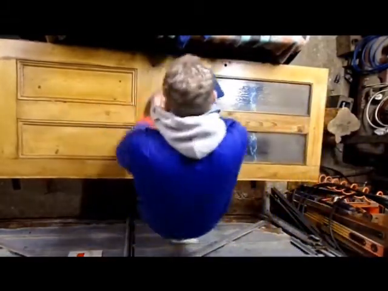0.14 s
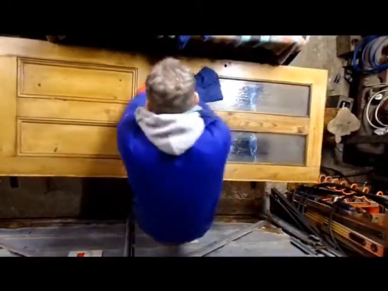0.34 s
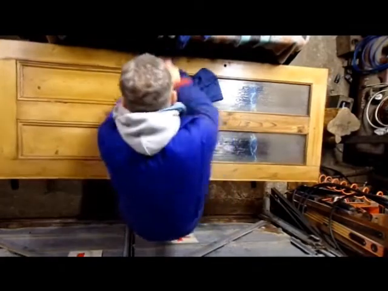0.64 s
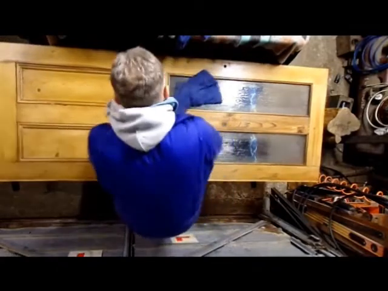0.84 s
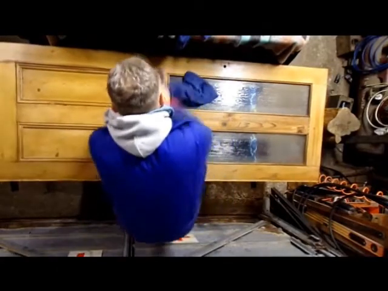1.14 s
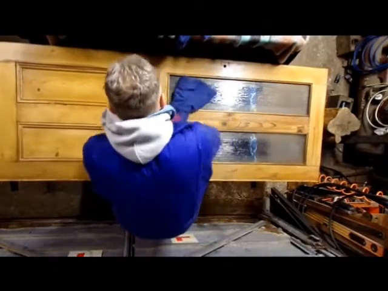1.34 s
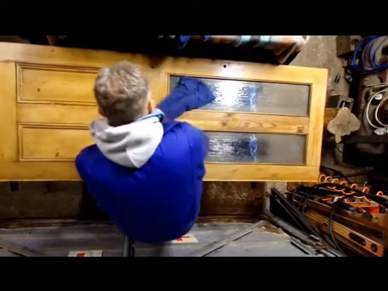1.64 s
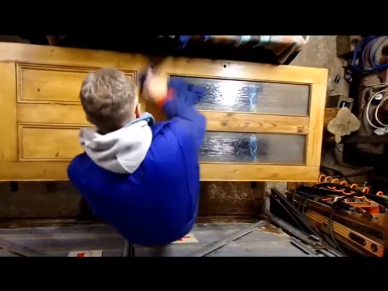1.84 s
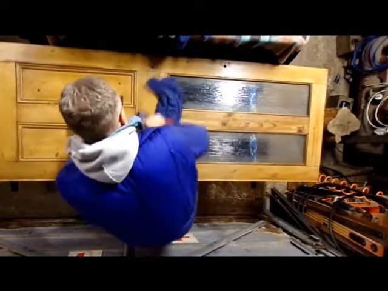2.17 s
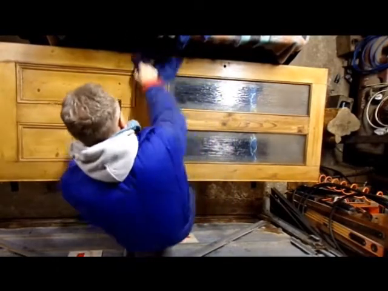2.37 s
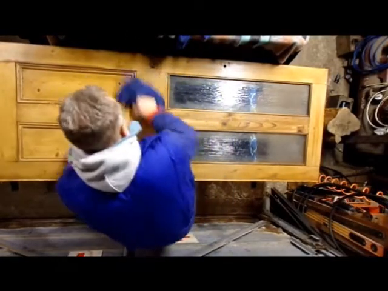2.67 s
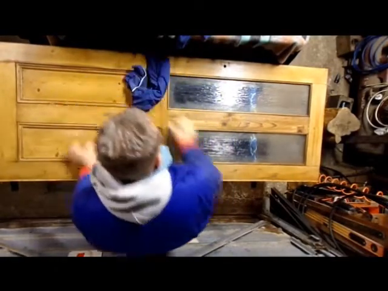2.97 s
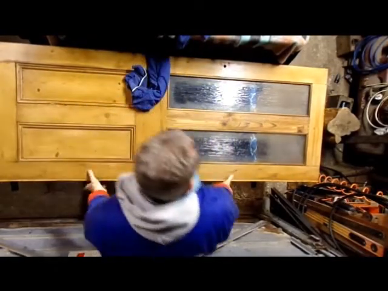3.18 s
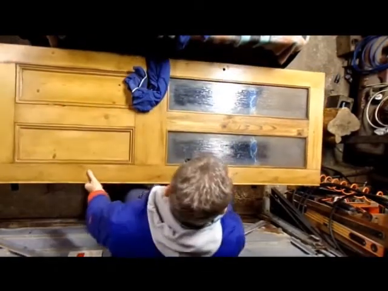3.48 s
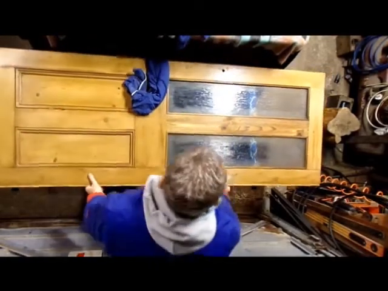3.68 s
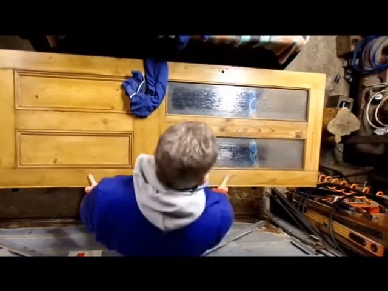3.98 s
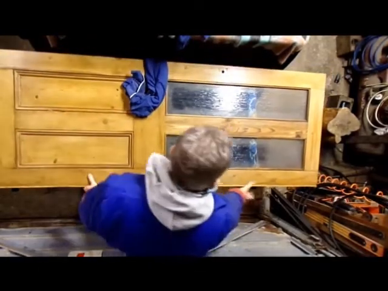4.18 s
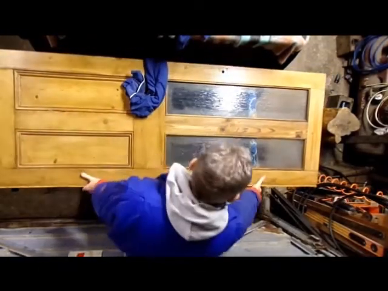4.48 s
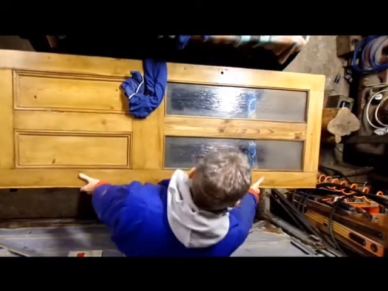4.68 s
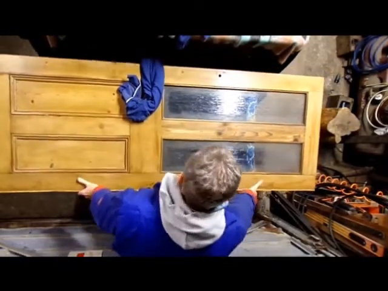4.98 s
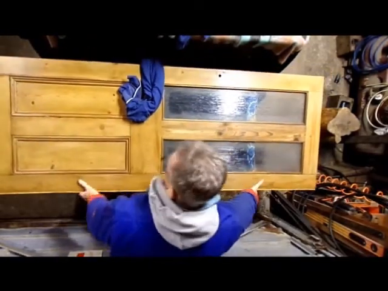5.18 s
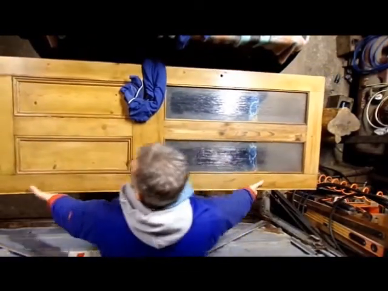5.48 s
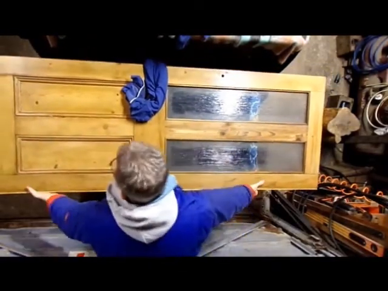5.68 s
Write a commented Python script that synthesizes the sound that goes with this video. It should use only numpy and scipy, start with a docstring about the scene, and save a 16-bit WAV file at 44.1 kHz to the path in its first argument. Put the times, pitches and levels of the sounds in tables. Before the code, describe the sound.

Uneven cloth strokes on varnished wood, close and mono in a small workshop. Deep hollow thuds and sharp knocks dominate early, each rebounding quickly as the door rocks and its glass panes buzz. The middle is sparse: soft rubbing, brief high squeaks, light swishes. Later, hands shift the door with a few duller knocks, faint loose-metal chatter and a last soft bump. Quiet hiss lies underneath.

```python
"""In a small workshop a glazed wooden door lies flat and is wiped with a cloth in uneven strokes.
Hands shift it: knocks and decaying modes boom, shaped noise thuds in the wood and rattles the panes.
Coloured grainy noise makes drone, scrape, swish and clicks; gliding tones squeak, loose metal tinkles.
A room tail surrounds the brighter sounds; a mono microphone notches the band and clips high peaks."""
import sys
import numpy as np
from scipy import signal
from scipy.fft import rfft, irfft, next_fast_len
from scipy.io import wavfile
from scipy.ndimage import map_coordinates

SR = 44100
rng = np.random.default_rng(int(sys.argv[2]) if len(sys.argv) > 2 else 0)


def to_wav(s):
    """Save 16-bit WAV."""
    ch = np.atleast_2d(s).T  # columns
    pcm = np.round(np.clip(ch, -1, 1) * 32767)  # PCM
    wavfile.write(sys.argv[1], SR, pcm.astype(np.int16))


N = 256662
TIME = np.arange(N) / SR

# door on its supports: t/s, level/dB, knock f/Hz; rel. to level: wood/dB, rattle/dB, first rebound/dB;
# rocking t60/s
DOOR_BUMPS = [(.016, -25.5, 98, -7.5, -20, -15, 0.3), (0.052, -25, 99, -8.5, -22, -15, 0.23),
              (0.258, -42.5, 147, -2.5, -23, 1.5, .8), (.433, -11, 320, -5, -12, -8.5, 0.6),
              (0.527, -27.5, 100, -4, -17, -14, 0.35), (.57, -28.5, 282, -2, -22, -3, 0.36),
              (0.813, -14, 176, -3, -9.5, -5, 0.44), (.915, -23, 92.5, -9.5, -23, -13.5, 0.66),
              (1.114, -29, 294, -0.5, -19.5, -5.5, 0.35), (1.168, -32.5, 91, -28, -17.5, -18, 0.79),
              (1.368, -35, 183, -7, -17, -8, 0.32), (1.4, -34.5, 108, -20, -37.5, -19.5, 0.27),
              (2.357, -47, 95, -9, -15, -10, 0.27), (2.471, -42.5, 89.5, -6.5, -3, -12, 0.27),
              (2.845, -36, 280, -6, -6, -6.5, 0.31), (3.275, -40.5, 123, -18, -40, -17, .3),
              (3.445, -40, 92, -7, -13, -7, 0.23), (3.556, -41.5, 169, -22, -17, -6.5, .3),
              (3.787, -27.5, 142, -29.5, -18, -24.5, 0.33), (3.801, -24, 314, -5, -13.5, -17, 0.54),
              (3.839, -32.5, 93.7, -21, -30, -23, 0.52), (4.555, -44, 277, -15, -13, -13.5, .4),
              (4.62, -34.5, 121, -5.5, -20.5, -16, 0.61), (4.88, -26, 274, -4, -19, -20, .2),
              (4.888, -22, 200, -7, -11, -9.5, 0.36), (5.751, -36, 180, -10, -18, -7, .5)]


def amp(db):
    """Decibels to gain."""
    return 10 ** (np.asarray(db) / 20)


def unit(x):
    """Scale to rms 1."""
    return x / np.sqrt(np.mean(x ** 2) + 1e-20)


def along(points, hz):
    """(f/Hz, value) points interpolated on a log frequency axis."""
    f, v = np.transpose(points)
    return np.interp(np.log(hz + 1), np.log(f + 1), v)


def filtered(x, response):
    """x times a response of frequency."""
    m = next_fast_len(len(x) + 8192)  # padding keeps the end from wrapping round
    return irfft(rfft(x, m) * response(np.fft.rfftfreq(m, 1 / SR)), m)[:len(x)]


def wobble(rate_hz, size):
    """A smooth random curve, rate_hz knots a second."""
    knots = rng.standard_normal(int(size * rate_hz / SR) + 4)
    return map_coordinates(knots, [np.arange(size) * rate_hz / SR])


def friction(spectrum, size, grain_db, tilt_db=0):
    """Tiny slips of uneven strength, coloured by a spectrum and a tilt per octave; rms 1."""
    slips = rng.standard_normal(size) * amp(grain_db * wobble(300, size))

    def colour(hz):
        octaves = np.log2(np.maximum(hz, 700) / 3000)
        return amp(along(spectrum, hz) + tilt_db * octaves)

    return unit(filtered(slips, colour))


def add(track, s, sound):
    """Mix a sound into the track at s seconds."""
    start = min(max(round(s * SR), 0), N)
    track[start:start + len(sound)] += sound[:N - start]


def strike(t, rise_s, t60_s):
    """An envelope that builds up and dies away."""
    return (1 - np.exp(-t / rise_s)) * amp(-60 * t / t60_s)


def in_room(x, wet_db):
    """The sound plus a diffuse workshop tail whose noise decays at a rate set by frequency."""
    # workshop decay: f/Hz, t60/s
    room_decay = [(60, 0.35), (200, 0.18), (1000, 0.15), (3000, 0.17), (8000, 0.23), (15000, 0.04)]
    hz, t, z = signal.stft(rng.standard_normal(SR // 2), SR, nperseg=256)
    decay = amp(-60 * t / along(room_decay, hz)[:, None])
    tail = signal.istft(z * decay, SR, nperseg=256)[1]
    tail = np.pad(tail / np.linalg.norm(tail), (SR // 150, 0))  # delayed by 1/150 s
    return x + amp(wet_db) * signal.fftconvolve(x, tail)[:len(x)]


def floor_noise():
    """Still room and microphone hiss: steady shaped noise."""
    # floor colour: f/Hz, relative level/dB
    floor_colour = [(25, -2), (90, 7.5), (300, 8), (1000, 4), (3000, -2.5), (7000, -15), (10500, -21.5),
                    (13000, -10), (15500, -9.5)]
    noise = rng.standard_normal(N)
    return amp(-74) * unit(filtered(noise, lambda hz: amp(along(floor_colour, hz))))


def tinkles():
    """A small loose piece of metal chatters: random phase jitters a few high modes."""
    # tinkles: t/s, level/dB
    metal_hits = [(3.813, -58), (4.676, -64), (4.704, -55.5), (4.93, -57.5)]
    # metal modes: f/Hz, relative level/dB, t60/s
    metal_modes = [(3870, 2, 0.1), (6760, -6.5, 0.14), (8870, -5, 0.1)]
    out, t = np.zeros(N), np.arange(SR // 3) / SR
    for s, db in metal_hits:
        for hz, mode_db, t60_s in metal_modes:
            chatter_rad = 1.83 * wobble(435, len(t))
            tone = np.sin(2 * np.pi * hz * t + chatter_rad)
            add(out, s, amp(db + mode_db) * strike(t, 0.0026, t60_s) * tone)
    return out


def squeaks():
    """Hands catch on the varnish; stick and slip lock briefly into a gritty, gliding pitch."""
    # catches: t/s, length/s, first f/Hz, last f/Hz, level/dB, roughness as a share of the pitch
    catches = [(1.428, 0.24, 291.7, 294, -58.5, .013), (1.55, 0.095, 550, 629, -62.5, 0.13),
               (2.057, .05, 2276, 2290, -55.5, 0.053), (2.225, 0.015, 3460, 3390, -54, 0.032),
               (2.233, 0.038, 2017, 1980, -47.5, .07), (3.547, 0.022, 1364, 1400, -61, 0.093),
               (5.165, .022, 3900, 3920, -56, .05), (5.671, 0.046, 2494, 2470, -60.5, .16)]
    out, t = np.zeros(N), np.arange(SR // 2) / SR
    for s, length_s, first_hz, last_hz, db, rough in catches:
        u = np.minimum(t / length_s, 1)
        glide_hz = first_hz + (last_hz - first_hz) * u
        hz = glide_hz * (1 + rough * wobble(1173, len(t)))
        stutter_db = min(100 * rough, 7)  # rougher slips also stutter in level
        breaks = unit(amp(stutter_db * wobble(first_hz / 8, len(t))))
        grip = amp(db) * breaks * np.abs(np.sin(np.pi * u)) ** .5
        add(out, s, grip * np.sin(2 * np.pi * np.cumsum(hz) / SR))
    return out


def clicks():
    """Hard edges meet in a brief, bright crack of noise."""
    # crack colour: f/Hz, relative level/dB
    crack_colour = [(400, -34.5), (1500, 1.5), (4000, 5), (7000, -1.5), (10000, -7.5), (15000, -3.5)]
    # edge contacts: t/s, level/dB, t60/s
    edge_contacts = [(.429, -39, 0.066), (0.433, -36.5, 0.013), (0.813, -42, 0.011), (2.231, -66, 0.015),
                     (3.327, -45, 0.005), (3.602, -60, 0.015), (3.803, -50, 0.021), (4.889, -48.5, 0.064),
                     (5.17, -63, 0.014)]
    out, t = np.zeros(N), np.arange(SR // 8) / SR
    for s, db, t60_s in edge_contacts:
        crack = friction(crack_colour, len(t), grain_db=2)
        add(out, s, amp(db) * crack * strike(t, 0.00044, t60_s))
    return out


def flicks():
    """Quick cloth and sleeve strokes: friction noise swells, then fades as the hand slows."""
    # flicks: t/s, relative level/dB, rise/s, fall t60/s, brightness/dB per octave
    quick_strokes = [(0.166, -41, .017, 0.11, 1), (.181, -36, 0.032, 0.094, 0.5),
                     (.418, -32, 0.031, 0.059, -11.5), (0.699, -56.5, 0.015, 0.1, -4),
                     (.783, -36.5, .032, 0.08, -10), (1.117, -56, 0.036, 0.17, 6),
                     (1.859, -54.5, 0.03, .1, -.5), (2.07, -57, 0.0086, .1, 1),
                     (2.231, -52.5, 0.0044, 0.16, -1.5), (2.311, -51, 0.019, 0.24, -2.5),
                     (2.476, -63, 0.015, 0.063, -5), (2.744, -46.5, 0.0046, 0.45, -5.5),
                     (2.86, -50, 0.052, 0.15, 2.5), (3.235, -61.5, .01, 0.24, 2),
                     (3.326, -44, 0.0047, 0.17, 0.5), (3.395, -51, 0.012, 0.1, -8.5),
                     (3.598, -50, 0.0037, 0.17, 1), (5.169, -56.5, 0.0062, 0.11, -3.5),
                     (5.657, -61, 0.0063, 0.18, 0)]
    # swish colour: f/Hz, relative level/dB
    swish_colour = [(410, -10.5), (750, -12.5), (1100, -13), (1450, -5.5), (2100, 0), (3000, -1),
                    (5300, -9.5), (9300, -20), (11700, -36.5), (15500, -32)]
    out, t = np.zeros(N), np.arange(SR // 2) / SR
    for s, db, rise_s, t60_s, bright_db in quick_strokes:
        swell = np.sqrt(np.minimum(t / rise_s, 1))
        fade = amp(-60 * np.maximum(t - rise_s, 0) / t60_s)
        swish = friction(swish_colour, len(t), grain_db=-1.0, tilt_db=bright_db)
        add(out, s, amp(db - 1.5) * swell * fade * swish)
    return out


def stroke(middle_s, length_s):
    """The hand leans in and lets go; length_s spans the -10 dB points."""
    sharpness = 1.2
    return amp(-20 * np.abs(2 * (TIME - middle_s) / length_s) ** sharpness / 2)


def rubbing():
    """Cloth drags over the grain; leaf drones, panels scrape, fibres hiss: (drone, rustle)."""
    # cloth and sleeve hiss before pressure flutter: t/s, level/dB
    light_hiss = [(0, -77), (.16, -57.5), (.29, -62), (.36, -60), (.74, -61), (1.25, -65), (1.75, -69),
                  (2.0, -62.5), (2.2, -66), (2.42, -58), (2.68, -63.5), (2.96, -56.5), (3.1, -76.5),
                  (3.3, -64.5), (4.1, -74), (4.55, -77), (4.72, -64), (5.1, -72), (5.42, -65), (5.82, -74)]
    # firm strokes before pressure flutter: middle t/s, length/s, drone level/dB, scrape level/dB
    firm_strokes = [(.01, 0.066, -29.5, -41.5), (0.273, 0.095, -46.5, -55.5), (1.58, 0.072, -68.5, -69),
                    (1.898, 0.037, -69, -60), (1.988, 0.082, -55.5, -70), (2.19, 0.054, -60.5, -86),
                    (2.36, 0.097, -59, -60), (2.474, 0.17, -56, -65), (2.77, 0.14, -76, -56),
                    (2.888, 0.23, -59, -56.5), (3.29, 0.069, -50, -78), (3.36, 0.087, -58, -55),
                    (3.48, .12, -50.5, -67), (3.586, 0.18, -61, -71.5), (3.98, 0.073, -54.5, -78),
                    (4.442, 0.16, -64.5, -79), (4.595, 0.059, -60, -75), (4.704, .17, -45, -58.5),
                    (5.428, 0.72, -66, -77.5), (5.804, 0.13, -50, -54.5)]
    # leaf, panel and fibre colours: f/Hz, relative level/dB
    drone_colour = [(30, -29.5), (60, -33.5), (85, 4), (110, -1), (170, -4.5), (230, -7.5), (290, -5.5),
                    (420, -18.5), (700, -64.5)]
    scrape_colour = [(250, -9.5), (450, -1.5), (600, 5.5), (700, -4.5), (800, 2.5), (1100, -13), (1500, -7),
                     (2500, -43.5)]
    cloth_colour = [(590, -45), (1000, -7.5), (1200, -11.5), (1710, -4.5), (2530, -2), (3650, -8),
                    (4010, -5.5), (4440, -11.5), (6260, -16.5), (7970, -22.5), (8940, -19), (11600, -38),
                    (15500, -25)]
    light_drone_db, light_scrape_db = -4.5, -7.5  # relative to the light hiss
    stroke_hiss_db = -9  # relative to the stroke's scrape
    shudder_db, shudder_scrape_db = -19, -18  # relative to the bump, to the shudder
    shudder_rise_s, shudder_t60_ratio = .02, 1.21  # ratio to the rocking t60

    hiss_power = amp(np.interp(TIME, *np.transpose(light_hiss))) ** 2
    drone_power = hiss_power * amp(light_drone_db) ** 2
    scrape_power = hiss_power * amp(light_scrape_db) ** 2
    for middle_s, length_s, drone_db, scrape_db in firm_strokes:
        lean = stroke(middle_s, length_s)
        drone_power += (amp(drone_db) * lean) ** 2
        scrape_power += (amp(scrape_db) * lean) ** 2
        hiss_power += (amp(scrape_db + stroke_hiss_db) * lean) ** 2

    t = np.arange(SR) / SR
    for s, db, *_, rocking_t60_s in DOOR_BUMPS:  # a bumped leaf also rubs on its supports
        shudder = amp(db + shudder_db) * strike(t, shudder_rise_s, shudder_t60_ratio * rocking_t60_s)
        add(drone_power, s, shudder ** 2)
        add(scrape_power, s, (amp(shudder_scrape_db) * shudder) ** 2)

    pressure = amp(1.8 * wobble(24.29, N))
    drone = np.sqrt(drone_power) * friction(drone_colour, N, grain_db=4)
    scrape = np.sqrt(scrape_power) * friction(scrape_colour, N, grain_db=1.0)
    hiss = np.sqrt(hiss_power) * friction(cloth_colour, N, grain_db=2)
    return pressure * drone, pressure * (scrape + hiss)


def contacts(count=6):
    """Bumps and rebounds as the door rocks to rest: (t/s, dB, knock f/Hz, wood/dB, rattle/dB)."""
    gap_s, gap_ratio, gap_scatter = .027, 0.94, .08  # ratio: each nominal gap over the last
    rebound_hz, scatter_octaves = 146, 0.14
    rebound_wood_db, rebound_rattle_db = -5, -0.5  # added to the bump's wood and rattle
    rows, k = [], np.arange(count)
    for s, db, knock_hz, wood_db, rattle_db, rebound_db, rocking_t60_s in DOOR_BUMPS:
        late, sharp = rng.standard_normal((2, count))
        times = s + np.cumsum(gap_s * gap_ratio ** k * (1 + gap_scatter * late))
        levels = db + rebound_db - 60 * (times - times[0]) / rocking_t60_s
        pitches = rebound_hz * 2 ** (scatter_octaves * sharp)
        rows.append((s, db, knock_hz, wood_db, rattle_db))
        for rebound in zip(times, levels, pitches):
            rows.append((*rebound, wood_db + rebound_wood_db, rattle_db + rebound_rattle_db))
    return rows


def bumps():
    """Each contact knocks and rings the door, thuds in the wood, shakes the panes: (boom, rattle)."""
    # door and pane modes: f/Hz, relative level/dB, t60/s
    door_modes = [(87.66, -3.5, 0.44), (105.66, 3, 0.3), (122.2, -15, 0.39), (142.6, 0, 0.37),
                  (170.8, -1.5, 0.16), (203.5, -5, 0.19), (278.3, -4, 0.22), (294, -16, 0.48),
                  (338.3, 0, 0.088), (357.8, -10, 0.13), (466, -16, 0.38), (503.7, -7, 0.19),
                  (590.2, -3, 0.16), (638, -16, 0.37), (731, -15, 0.21), (747.6, -16, 0.19),
                  (788, -19, 0.43), (815, -16, 0.21), (920, -16.5, 0.17), (1008, -28, 0.35),
                  (1642, -17, 0.14), (2050, -20, 0.21), (2570, -26, 0.34)]
    # crowd of short wood modes: f/Hz, relative level/dB
    wood_colour = [(35, -23.5), (90, -20.5), (230, 8), (340, 12), (430, -4), (560, 1.5), (850, -5.5),
                   (1150, -21.5), (2000, -12), (5000, -58)]
    # panes and supports: f/Hz, relative level/dB
    rattle_colour = [(530, -27), (900, -2.5), (1270, -6.5), (2570, -2), (3670, -8), (4040, -8.5),
                     (4330, -13), (6900, -25.5), (8050, -30), (8860, -28), (11600, -49), (15500, -45.5)]
    sway_db, sway_db_per_octave = -8.5, -9.5  # leaf sway at a 100 Hz knock; higher knocks sway it less

    boom, thud_power, rattle_power = np.zeros((3, N))
    t = np.arange(SR * 2 // 3) / SR
    hz, mode_db, t60_s = np.transpose(door_modes)
    sides = (-1) ** np.arange(len(hz))  # neighbouring modes swing in opposite senses
    swings = -sides[:, None] * np.sin(2 * np.pi * hz[:, None] * t)
    modes = swings * amp(-60 * t / t60_s[:, None])

    for s, db, knock_hz, wood_db, rattle_db in contacts():
        contact_s = 0.00091 / amp(db) ** .5  # gentle bumps stay in contact longer
        # the leaf bounces on its support for a few cycles, higher on a stiffer contact
        knock = -amp(3.0) * np.sin(2 * np.pi * knock_hz * t) * strike(t, contact_s, 0.06)
        bass_db = sway_db + sway_db_per_octave * np.log2(knock_hz / 100)
        force_points = [(110, bass_db), (170, -10.5), (300, wood_db),
                        (650, (wood_db + rattle_db) / 2), (1500, rattle_db + 5.5)]
        scatter_db = 2 * rng.standard_normal(len(hz))
        mode_gains = amp(along(force_points, hz) + mode_db + scatter_db)
        ring = mode_gains @ modes * (1 - np.exp(-t / contact_s))
        add(boom, s, amp(db) * (knock + amp(-1.5) * ring))
        add(thud_power, s, (amp(db + wood_db - 6.5) * strike(t, contact_s, 0.26)) ** 2)
        add(rattle_power, s, (amp(db + rattle_db) * strike(t, 2 * contact_s, 0.13)) ** 2)

    thud = np.sqrt(thud_power) * friction(wood_colour, N, grain_db=-3.5)
    rattle = np.sqrt(rattle_power) * friction(rattle_colour, N, grain_db=1.5)
    return boom + thud, rattle


def scene():
    """Bass comes straight from the broad leaf; brighter sounds scatter round the workshop."""
    floor = floor_noise()
    drone, rustle = rubbing()
    boom, rattle = bumps()
    bright = in_room(tinkles() + squeaks() + clicks() + flicks() + rustle + rattle, wet_db=-9.5)
    return (floor + drone + boom + bright)[None]


def record(dry):
    """The microphone port cuts notches and deep bass, the input clips and the band ends."""
    # port notches: f/Hz, width/Hz, depth 0-1
    port_notches = [(3680, 150, 1), (4383, 270, .85), (7950, 650, 1), (12140, 1600, .5)]
    low_cut_hz, clip_level, top_hz = 55, .255, 15750  # clip level: share of full scale

    def port(f):
        response = 1
        for centre_hz, width_hz, depth in port_notches:
            damping = 1j * f * width_hz
            response = response * (1 - min(depth, 1) * damping / (centre_hz ** 2 - f * f + damping))
        return response

    def low_cut(f):
        return -f * f / (low_cut_hz ** 2 - f * f + 1j * f * low_cut_hz)

    picked_up = filtered(dry[0], lambda f: port(f) * low_cut(f))
    clipped = np.clip(picked_up, -clip_level, clip_level)
    return filtered(clipped, lambda f: f < top_hz)[None]


dry = scene()
out = record(dry)
to_wav(out)
```